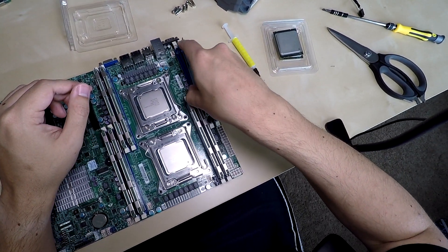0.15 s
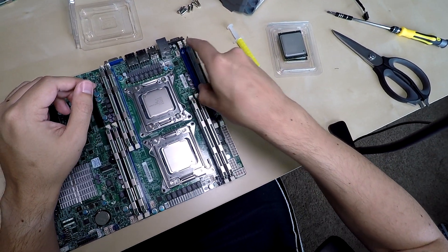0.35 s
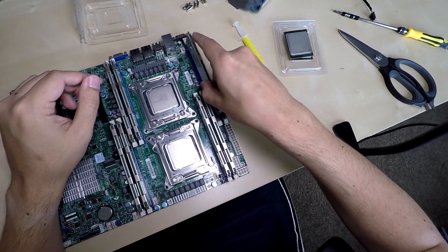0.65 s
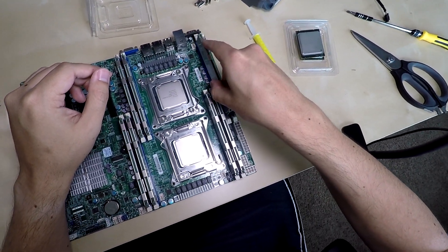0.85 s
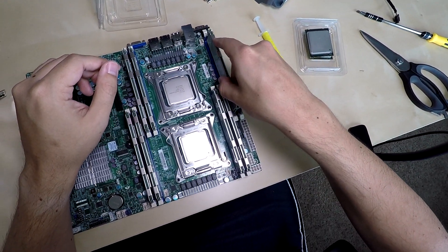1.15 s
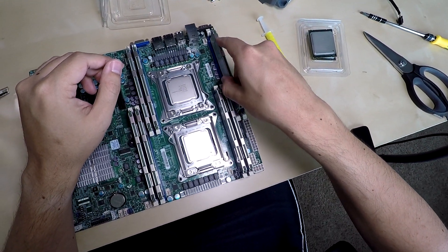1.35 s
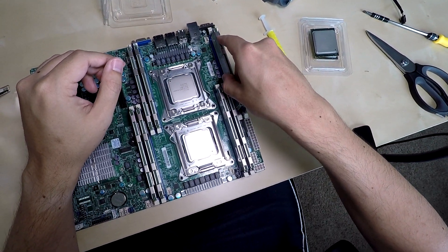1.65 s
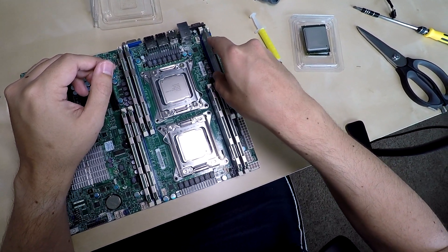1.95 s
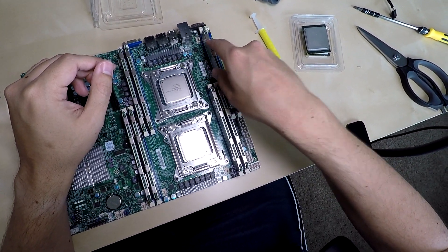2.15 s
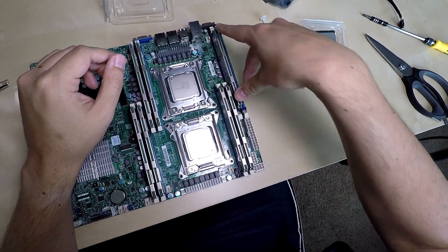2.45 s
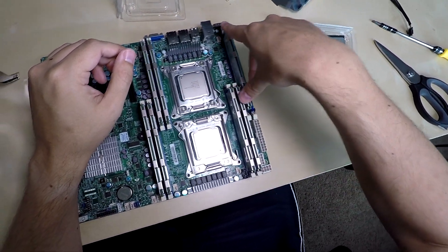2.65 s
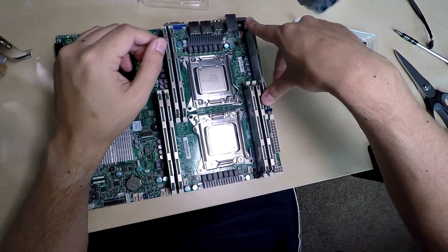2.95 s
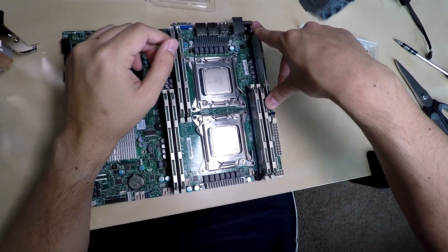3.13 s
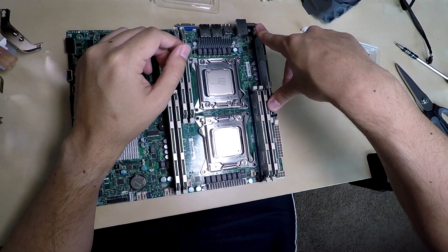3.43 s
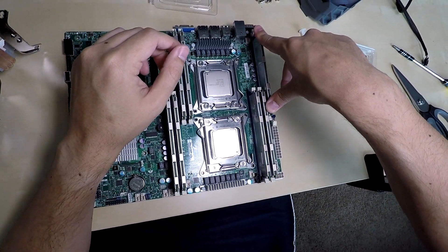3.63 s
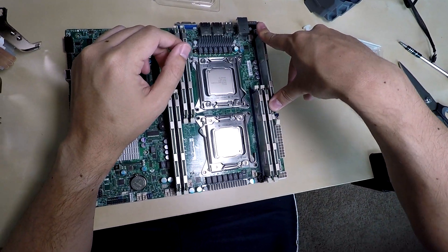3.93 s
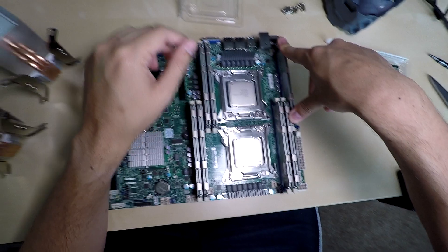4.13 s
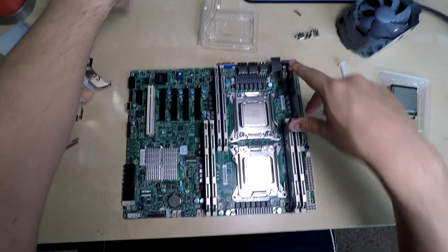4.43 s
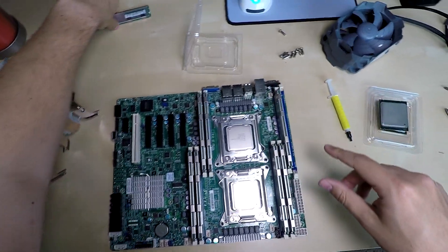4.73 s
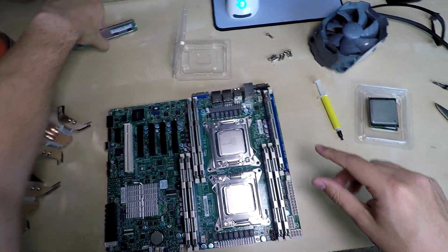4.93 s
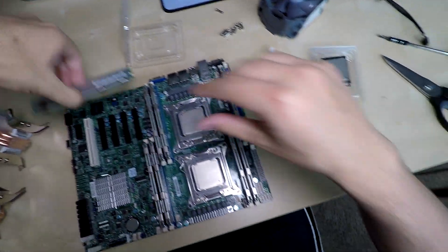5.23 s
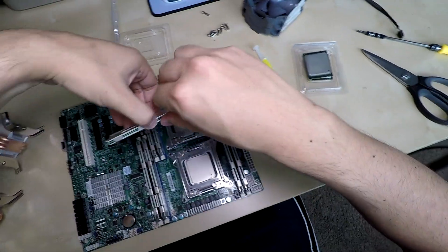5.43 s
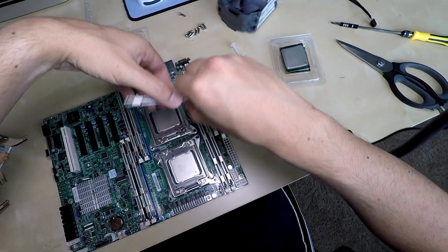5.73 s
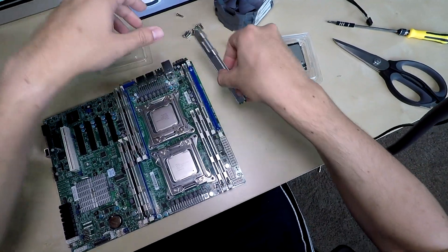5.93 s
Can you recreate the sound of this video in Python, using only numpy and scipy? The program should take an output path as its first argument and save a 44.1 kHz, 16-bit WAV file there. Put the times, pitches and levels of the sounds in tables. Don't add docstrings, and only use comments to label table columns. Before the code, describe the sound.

A close microphone in a small, slightly echoing room picks up a faint, wavering low machine hum, ventilation rumble and soft hiss throughout. From 0 to 0.4 seconds, quick plastic ticks and soft knocks of a circuit board on a wooden desk come in a cluster. Lighter contacts follow at 0.8 to 0.95, with small taps and tiny dry chirps around 1.4 to 1.6. Firmer pushes thud and tick from 1.9 to 2.1. It is quieter until faint knocks near 2.9 and 3.1. At 3.5 a loud, sharp plastic snap cracks, the board slapping, buzzing and bouncing while the desk sways low. A short creak at 3.8 leads to a second, crisper snap at 3.9 with a brief metallic ring. Small taps follow to 4.4, then a light module drags in stuttering scuffs from 4.6 to 4.95. Mostly hum and air remain, with a faint scrape just after 6.

```python
import sys
import numpy as np
from scipy import signal
from scipy.fft import rfft, irfft
from scipy.io import wavfile

SR = 44100
rng = np.random.default_rng(int(sys.argv[2]) if len(sys.argv) > 2 else 0)


def unload_audio(sound):
    columns = np.transpose(np.atleast_2d(sound))
    steps = np.round(np.clip(columns, -1, 1) * 32767)
    wavfile.write(sys.argv[1], SR, steps.astype(np.int16))


def magnitude_from_level(level_db):
    exponent = np.asarray(level_db, float) / 20
    return 10 ** exponent


N = 268128

# pitch in Hz, level in dB per Hz.
AIR = [(8.8, -19.5), (15, 4.5), (60, 1), (121, -11.5), (420, -29), (4910, -38.5), (9030, -44.5),
       (15200, -48)]
AIR_DB = -56
# time in seconds, level in dB.
HUM = [(0.0, -48.5), (0.2, -41.5), (0.4, -43.5), (0.54, -48.5), (0.63, -41.5), (0.88, -50), (0.97, -41.5),
       (1.2, -40), (1.39, -48), (2.13, -41), (2.24, -54), (2.35, -44.5), (4.3, -53.5), (4.64, -46),
       (4.99, -62), (5.33, -43), (5.72, -55.5), (5.85, -48)]
HUM_HZ, HUM_WIDTH_HZ = 71.36, 3.2
# start in seconds, held time in seconds, rumble level in dB.
LEANS = [
    (0.0, 0.079, -43),
    (0.22, 0.17, -49.5),
    (0.88, .01, -46.5),
    (1.39, .5, -51.5),
    (2.05, .01, -44.5),
    (4.0, 0.026, -53),
    (4.42, 0.04, -56),
]
LEAN_REST_DB, LEAN_RISE_DB_PER_S, LEAN_FALL_DB_PER_S = -59, 46.5, 64
# pitch in Hz, width in Hz, level in dB.
LEAN_RINGS = [(128, 36, 1), (213.2, 31, -1), (271.4, 47, -4), (418.7, 290, -16.5)]

# start in seconds, peak in dB, ring pitch in Hz,
# bright edge in dB against the ring, length of the slip in seconds.
TICKS = [(0.0145, -20.5, 4500, -18, 0.014), (0.0513, -30.5, 2300, -30, 0.01),
         (0.0734, -39.5, 2160, -10, 0.011), (0.1341, -44.5, 2080, -25, .007),
         (0.2734, -26, 2200, -34, 0.0067), (0.314, -37, 3370, -16, 0.016), (0.3481, -39, 1930, -7, .012),
         (0.8162, -49, 7700, 1, 0.011), (0.8375, -40.5, 8400, 12, 0.0082), (1.5703, -54, 2120, -20, 0.0034),
         (1.8772, -41.5, 2110, -24, .0021), (1.989, -38, 2020, -23, 0.005),
         (2.0695, -29.5, 3270, -14, 0.013), (2.0878, -29.5, 1760, -10, 0.013),
         (3.1448, -50, 1920, -17, .0097), (2.88, -66, 1050, -35, 0.0044), (4.389, -46, 4500, -8, 0.0071),
         (4.928, -50, 2900, -18, 0.0095)]
CREAKS = [
    (3.5075, -21.5, 2520, -18.5, 0.0053),
    (3.795, -47, 2200, -23, .0084),
    (3.811, -47, 2200, -20.5, 0.035),
    (3.873, -30.5, 2300, -10, 0.0052),
    (3.889, -31.5, 3800, -16.5, 0.0033),
    (4.152, -52.5, 2200, 0, 0.015),
]
# pitch in Hz, width in Hz, level in dB.
SLOT = [(1250, 500, 5.5), (2200, 460, 11), (3547, 450, 7)]
PINS = [(4300, 290, 0.22), (5500, 2600, -1.2)]
TICK_PINS_DB, CREAK_PINS_DB = -13.5, -14.5
PINS_FOLLOW = 0.31
TICK_RING_DB, TICK_DAMPING = 5, 0.12
TICK_LEAD, SNAP_LEAD, KNOCK_LEAD = 0.3, 0.55, 0.43

# start in seconds, peak in dB, strongest ring in Hz,
# upper rings in dB against the peak, length of the contact in seconds.
KNOCKS = [(0.017, -20, 227, -1, 0.037), (0.075, -29.5, 232, -17, 0.014), (0.141, -35, 412, -19, 0.028),
          (0.272, -26.5, 466, -10.5, 0.029), (0.316, -30, 396, -6.5, 0.045), (0.364, -27, 306, -14, 0.019),
          (0.823, -38, 297, -18, 0.024), (0.876, -41.5, 225, -1, 0.025), (1.377, -42, 307, -14, 0.021),
          (1.468, -42, 403, -14, .015), (1.486, -39.5, 377, -16, 0.013), (1.57, -49, 500, -2, 0.0072),
          (1.579, -33.5, 325, -13.5, 0.0092), (1.915, -44, 466, -17, 0.0083), (2.01, -47, 462, -1, .015),
          (2.034, -36.5, 203, -26, 0.023), (2.073, -21, 438, -10, 0.032), (2.098, -27, 380, 1.5, 0.025),
          (2.878, -36.5, 445, -7.5, 0.018), (3.139, -47, 255, -4, .018), (3.8, -44, 303, 0, 0.06)]
# start in seconds, peak in dB, upper rings in dB against the peak.
PUSHES = [
    (0.837, -34.5, -14),
    (0.952, -48, -19),
    (1.878, -29.5, -7.5),
    (1.993, -21.5, -11),
    (2.95, -38.5, -30),
    (3.88, -19.5, -17),
    (4.15, -44, -10),
    (4.403, -36.5, -13),
]
PUSH_HZ, PUSH_S, PUSH_THUD_DB = 155.8, 0.028, -1
# start in seconds, peak in dB.
BOUNCES = [
    (3.547, -32.5),
    (3.569, -29.5),
    (3.629, -34),
    (3.648, -37),
    (3.699, -42.5),
    (3.938, -46),
]
BOUNCE_HZ, BOUNCE_S, BOUNCE_THUD_DB, BOUNCE_EDGE_DB = 375, 0.007, -10, -17
# pitch in Hz, width in Hz, level in dB.
BOARD = [(130.9, 9.1, 0), (205, 19, -1.5), (265, 51, 6.5), (299, 59, 1.5), (443, 64, 3.5), (526, 71, -4)]
BOARD_EDGE = [(634, 104, 14), (762, 153, 15.5), (949, 80, 5), (1129, 222, -5)]
KNOCK_THUD_DB, THUD_GROWTH = -13, 0.6

# start in seconds, peak in dB, ring pitch in Hz, length in seconds.
SQUEAKS = [
    (1.42, -61, 3670, .004),
    (1.463, -51.5, 3720, 0.0032),
    (1.473, -50, 3800, 0.0041),
    (1.761, -58.5, 2280, .004),
    (1.982, -50, 3900, 0.0082),
    (2.545, -65, 12500, .01),
    (5.43, -64, 13960, .012),
    (5.62, -59, 13500, .01),
    (5.67, -58, 12800, .006),
]
# time in seconds, level in dB.
WHINE = [(3.0, -110), (3.15, -83.5), (4.5, -84.5), (5.0, -88), (6.08, -90)]
WHINE_HZ = 13356

# start in seconds, peak in dB, length in seconds,
# rattle in dB against the peak, rattle length in seconds.
SLAPS = [
    (3.509, -19.5, 0.029, -21.5, 0.15),
    (3.894, -17, 0.027, -20.5, 0.043),
]
# pitch in Hz, width in Hz, level in dB.
SLAP_A = [(127, 40, 7), (196, 38, -17.5), (367, 53, -5.5), (500, 13, 0.5), (680, 390, -5.5),
          (990, 260, -6.5), (1173, 52, -3.5)]
SLAP_B = [(131, 85, 17), (277.6, 100, 10), (370.8, 76, 15), (556, 380, 8.6), (846, 87, 14.2),
          (1070, 560, 2.5), (1505, 570, 2.58)]

# start in seconds, peak in dB, length of the slip in seconds,
# rebound delay in seconds, rebound length in seconds.
SNAPS = [
    (3.5123, -4, .0018, .0152, .0008),
    (3.8978, -3.5, .0009, .0035, .003),
]
# buzz in dB against the snap, buzz length in seconds,
# metal ringing in dB against the snap, ringing length in seconds.
AFTER = [
    (-9, 0.0083, -33, 0.073),
    (-18.5, 0.018, -17.5, 0.01876),
]
# pitch in Hz, width in Hz, level in dB.
TAB_A = [(1390, 3800, -30), (2300, 940, -21), (4470, 980, -5.5), (5440, 680, 0.5), (7884, 2000, -5.5),
         (10230, 277, -0.5), (15200, 7500, -9)]
TAB_B = [(1218, 540, -12.5), (2222, 820, -2.5), (3620, 560, 3), (4500, 1460, -0.5), (5620, 1100, -4),
         (8550, 3300, -7), (11000, 3100, -8.5), (14370, 2500, -10.5)]
COVER_A = [(5210, 311, 6.5), (5860, 340, 3), (6840, 470, -9.5), (7720, 400, -5.5), (8390, 240, 2)]
COVER_B = [(2400, 210, -4), (3500, 550, -13.5), (5080, 710, 7.5), (7976, 1000, 5.5)]
REBOUND_DB = -9.5

# start in seconds, peak in
# dB, pitch in Hz, time to fall 60 dB in seconds.
SWAYS = [
    (3.528, -28.5, 27.7, 0.27),
    (3.559, -25.5, 40.4, 0.18),
    (3.883, -24.5, 52.5, 0.19),
    (3.515, -35, 72, .35),
]

# start in seconds, hold in seconds, edge scrape in dB,
# weight on the desk as rumble in dB against the scrape.
STROKES = [
    (4.596, .01, -65, 7.5),
    (4.614, 0.034, -63, -3),
    (4.669, 0.036, -48, 12),
    (4.716, 0.0099, -58, 15.5),
    (4.746, 0.012, -55, 18),
    (4.767, 0.052, -54.5, 11.5),
    (4.85, 0.04, -65, 9.5),
    (4.903, 0.018, -63, 16.5),
    (6.025, 0.026, -71, 3.5),
    (6.058, .03, -64.5, 10),
]
STROKE_RISE_S, SCRAPE_FALL_DB_PER_S, RUMBLE_FALL_DB_PER_S = 0.0089, 500, 346
HISS_DB, HISS_DULLING = 3, 0.8
# pitch in Hz, width in Hz, level in dB.
SLIDE_DESK = [(299, 46, 9), (340, 78, 3.5), (420, 29, 8.5), (527, 88, 2.5), (572, 58, 3), (880, 280, -9.5),
              (1345, 280, -22)]
SLIDE_EDGE = [(1520, 430, 7.5), (2190, 115, 12), (3440, 960, 2), (4570, 310, 4), (5680, 2800, -7.5)]

# pitch in Hz, time to fall 60 dB in seconds.
ROOM = [(100, .4), (500, 0.38), (2000, 0.33), (5000, 0.3), (9000, 0.3), (12000, .25), (15000, 0.19)]
ROOM_DB, ROOM_GAP_S = -12.5, 0.0036
QUIET_TOP_HZ, MIC_TOP_HZ, LAST_SNAP_S = 15480, 16800, 3.8


def rms_one(x):
    return x / np.sqrt(np.mean(x ** 2) + 1e-20)


def level_in_time(rows):
    s, level_db = np.transpose(rows)
    return np.interp(np.arange(N) / SR, s, level_db)


def at_hz(points, hz):
    table_hz, values = np.transpose(points)
    return np.interp(np.log(hz), np.log(table_hz), values)


def coloured(spectrum):
    hz = np.arange(N // 2 + 1) * SR / N + 1
    return irfft(rfft(rng.standard_normal(N)) * magnitude_from_level(at_hz(spectrum, hz)), N)


def drift(rate):
    return rms_one(coloured([(1, 0), (1 + rate, 0), (30 + 30 * rate, -60)]))


def resonate(x, hz, width_hz):
    r = np.exp(-np.pi * abs(width_hz) / SR)
    feedback = [1, -2 * r * np.cos(2 * np.pi * hz / SR), r * r]
    return signal.lfilter([(1 - r * r) / 2, 0, (r * r - 1) / 2], feedback, x)


def body(x, modes):
    out = 0
    for k, (hz, width_hz, db) in enumerate(modes):
        out = out + (-1) ** k * magnitude_from_level(db) * resonate(x, hz, width_hz)
    return out


def high_pass(x, hz):
    return signal.sosfilt(signal.butter(2, hz, "high", fs=SR, output="sos"), x)


def low_pass(x, hz):
    return signal.sosfilt(signal.cheby2(18, 50, hz, fs=SR, output="sos"), x)


def band_pass(x, low_hz, high_hz):
    return signal.sosfilt(signal.butter(2, [low_hz, high_hz], "band", fs=SR, output="sos"), x)


def strike(out, s, peak_db, length_s, grain, colour, rise_s=1e-5, lead=0):
    t = np.arange(SR // 2) / SR
    blow = signal.unit_impulse(len(t))
    sizes = rng.standard_normal(len(t)) * magnitude_from_level(grain * np.minimum(rng.exponential(1, len(t)), 4))
    sizes = sizes * np.minimum(t / rise_s, 1) * np.exp(-t / max(length_s, 0.0003))
    first = lead * np.sqrt(np.sum(sizes ** 2)) * blow
    near = colour(sizes + first + 1e-18)
    near = magnitude_from_level(peak_db) * near / np.abs(near).max()
    far = rms_one(colour(blow + 1e-18)) * near.std()
    at = max(round(s * SR), 0)
    return out + np.pad([near, far], ((0, 0), (at, N)))[:, :N]


def air():
    noise = coloured(AIR)
    noise = noise / np.std(high_pass(noise, 87.3))
    noise = noise - 0.91 * resonate(noise, HUM_HZ, 35)
    hiss = high_pass(noise, 500)
    rumble = (noise - hiss) * magnitude_from_level(1.7 * drift(5.4))
    return magnitude_from_level(AIR_DB) * (hiss + rumble)


def hum():
    tone = resonate(rng.standard_normal(N), HUM_HZ, HUM_WIDTH_HZ)
    tone = signal.hilbert(resonate(tone, HUM_HZ, 3 * HUM_WIDTH_HZ))
    even = tone.real / (np.abs(tone) + 1e-9) ** 0.7
    return magnitude_from_level(level_in_time(HUM)) * rms_one(even)


def lean():
    t, level_db = np.arange(N) / SR, LEAN_REST_DB
    for s, held_s, db in LEANS:
        before_s, after_s = np.maximum(s - t, 0), np.maximum(t - s - held_s, 0)
        fade_db = LEAN_RISE_DB_PER_S * before_s + LEAN_FALL_DB_PER_S * after_s
        level_db = np.maximum(level_db, db - fade_db)
    lumps = rng.standard_normal(N) * magnitude_from_level(1.7 * drift(23))
    return magnitude_from_level(level_db - 2.5) * rms_one(body(lumps, LEAN_RINGS))


def ticks(table, pins_db, rise_s, lead=0):
    out = 0
    for s, peak_db, hz, edge_db, length_s in table:
        def colour(x):
            own = magnitude_from_level(TICK_RING_DB) * resonate(x, hz, TICK_DAMPING * hz)
            rings = band_pass(rms_one(own + body(x, SLOT)), 1000, max(hz + 1500, 4300))
            pins = magnitude_from_level(pins_db + PINS_FOLLOW * (edge_db + 17)) * rms_one(body(x, PINS))
            edge = magnitude_from_level(edge_db - 6.0) * rms_one(high_pass(x, 8300))
            return rings + pins + edge
        out = strike(out, s, peak_db - 0.5, length_s, 0.86, colour, rise_s, lead)
    return out


def knocks():
    contacts = []
    for s, db, hz, edge_db, length_s in KNOCKS:
        thud_db = KNOCK_THUD_DB + THUD_GROWTH * (db + 30.5)
        contacts.append((s, db, hz, thud_db, edge_db, length_s))
    for s, db, edge_db in PUSHES:
        contacts.append((s, db, PUSH_HZ, PUSH_THUD_DB, edge_db, PUSH_S))
    for s, db in BOUNCES:
        contacts.append((s, db, BOUNCE_HZ, BOUNCE_THUD_DB, BOUNCE_EDGE_DB, BOUNCE_S))
    out = 0
    for s, peak_db, hz, thud_db, edge_db, length_s in contacts:
        def colour(x):
            rings = rms_one(magnitude_from_level(9.0) * resonate(x, hz, 0.16 * hz) + body(x, BOARD[1:]))
            thud = magnitude_from_level(thud_db + 1.5) * rms_one(body(x, BOARD[:1]))
            edge = magnitude_from_level(edge_db - 2.5) * rms_one(body(x, BOARD_EDGE))
            return rings + thud + edge
        out = strike(out, s, peak_db - 3.0, length_s, 2.8, colour, 0.0021, KNOCK_LEAD)
    return out


def squeaks():
    out = 0
    for s, peak_db, hz, length_s in SQUEAKS:
        def colour(x):
            return resonate(resonate(x, hz, 0.18 * hz), hz, 0.18 * hz)
        out = strike(out, s, peak_db, length_s, 1.5, colour, 0.0012)
    return out


def whine():
    return magnitude_from_level(level_in_time(WHINE) - 0.5) * np.sin(2 * np.pi * WHINE_HZ * np.arange(N) / SR)


def slaps():
    out = 0
    for slap, board in zip(SLAPS, (SLAP_A, SLAP_B)):
        s, peak_db, length_s, rattle_db, rattle_s = slap
        out = strike(out, s, peak_db, length_s, 0.93, lambda x: body(x, board), 0.0026, KNOCK_LEAD)
        out = strike(out, s, peak_db + rattle_db, rattle_s, 14.0, lambda x: body(x, board[2:]), 0.06)
    return out


def snaps():
    blows, after = 0, 0
    for snap, rest, tab, cover in zip(SNAPS, AFTER, (TAB_A, TAB_B), (COVER_A, COVER_B)):
        s, peak_db, length_s, delay_s, rebound_s = snap
        buzz_db, buzz_s, ring_db, ring_s = rest

        def plastic(x):
            return body(x, tab)

        def metal(x):
            return low_pass(high_pass(body(x, cover), 2000), 14000)
        blows = strike(blows, s, peak_db, length_s, 1.27, plastic, lead=SNAP_LEAD)
        after = strike(after, s + delay_s, peak_db + REBOUND_DB, rebound_s, 1.5, plastic)
        after = strike(after, s, peak_db + buzz_db, buzz_s, 1.2, plastic)
        after = strike(after, s, peak_db + ring_db, ring_s, 1.4, metal)
    return blows, after


def sways():
    out, t = 0, np.arange(N) / SR
    for s, peak_db, hz, t60_s in SWAYS:
        since = np.maximum(t - s, 0)
        out = out + np.sin(2 * np.pi * hz * since) * magnitude_from_level(peak_db - 60 * since / t60_s)
    return out


def slide():
    grains = rng.standard_normal(N) * magnitude_from_level(1.5 * rng.exponential(1, N) + 1.5 * drift(45))
    rumble = rms_one(high_pass(high_pass(body(grains, SLIDE_DESK), 190), 180))
    scrape = rms_one(high_pass(body(grains, SLIDE_EDGE), 1200))
    hiss = rms_one(high_pass(grains, 5200))
    out, t = 0, np.arange(N) / SR
    for s, hold_s, scrape_db, weight_db in STROKES:
        rise = np.clip((t - s) / STROKE_RISE_S, 0, 1)
        after_s = np.maximum(t - s - STROKE_RISE_S - hold_s, 0)
        edge = scrape + magnitude_from_level(HISS_DB - HISS_DULLING * weight_db) * hiss
        edge = edge * magnitude_from_level(-SCRAPE_FALL_DB_PER_S * after_s)
        desk = magnitude_from_level(weight_db - RUMBLE_FALL_DB_PER_S * after_s) * rumble
        out = out + magnitude_from_level(scrape_db - 3.0) * rise * (edge + desk)
    return out


def room(x):
    t = np.arange(SR * 3 // 4) / SR
    echo = 0
    for hz in 60 * 2 ** np.arange(0, 8.5, 0.5):
        band = band_pass(rng.standard_normal(len(t)), hz / 2 ** 0.25, hz * 2 ** 0.25)
        echo = echo + band * magnitude_from_level(-60 * t / at_hz(ROOM, hz))
    echo = echo * np.clip(t / ROOM_GAP_S - 1, 0, 1)
    return magnitude_from_level(ROOM_DB) * signal.fftconvolve(x, echo / np.sqrt(np.sum(echo ** 2)))[:N]


def scene():
    (blow, blow_far), after = snaps()
    slips = ticks(TICKS, TICK_PINS_DB, 0.00029, TICK_LEAD)
    slips = slips + ticks(CREAKS, CREAK_PINS_DB, rise_s=0.006)
    near, far = slips + knocks() + squeaks() + slaps() + after
    sharp = blow * (np.arange(N) / SR > LAST_SNAP_S)
    quiet = blow - sharp + near + room(far + blow_far)
    quiet = quiet + sways() + slide() + lean() + hum() + whine() + air()
    return (sharp + low_pass(quiet, QUIET_TOP_HZ))[None]


def top_cut(x):
    return signal.sosfilt(signal.butter(12, 16650, fs=SR, output="sos"), x)


def record(dry):
    mix = low_pass(dry, MIC_TOP_HZ)
    return top_cut(mix)


dry = scene()
out = record(dry)
unload_audio(out)
```